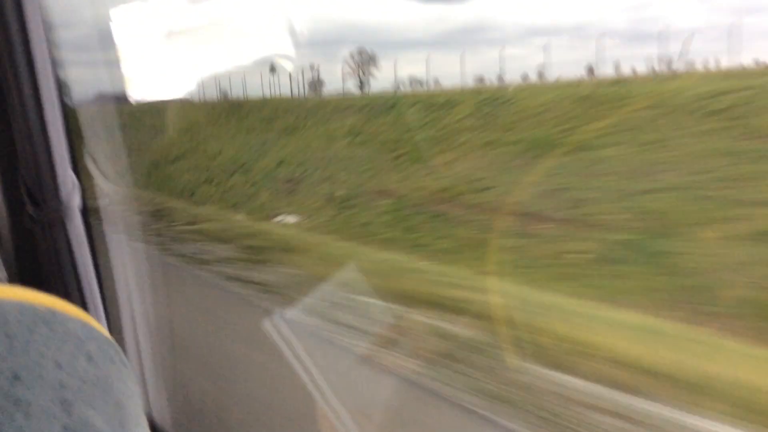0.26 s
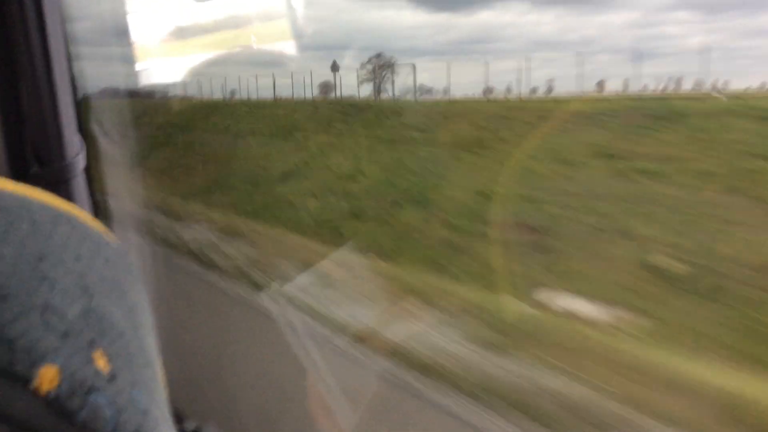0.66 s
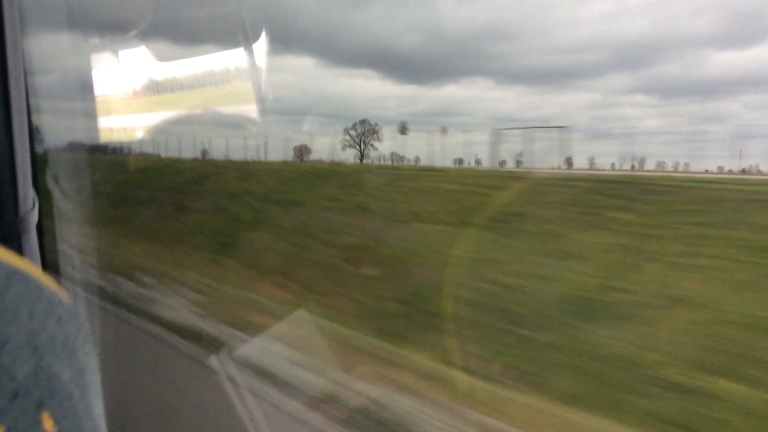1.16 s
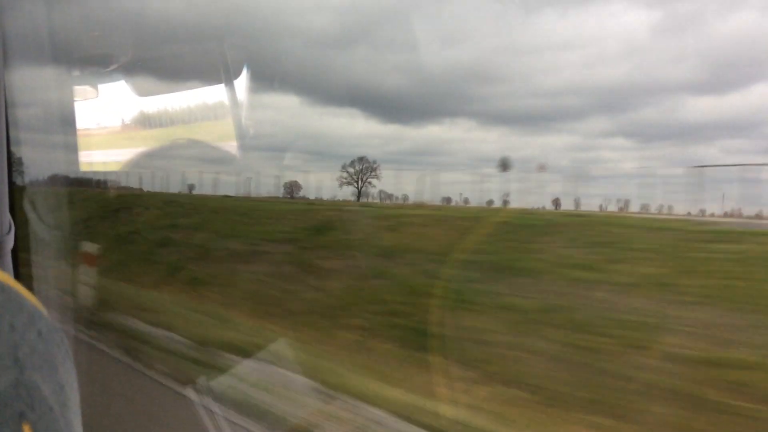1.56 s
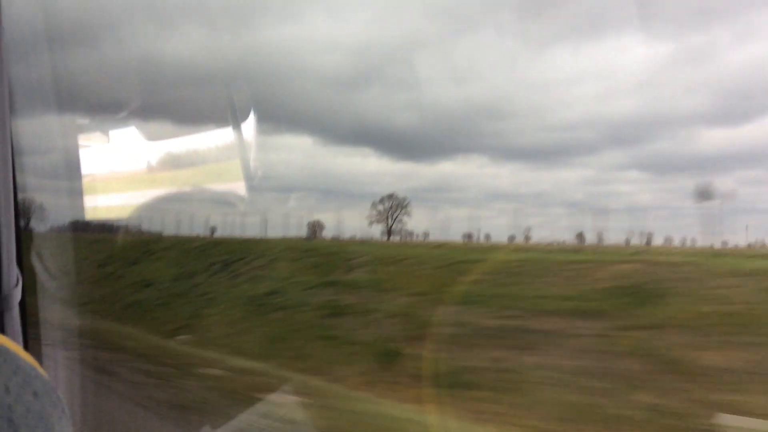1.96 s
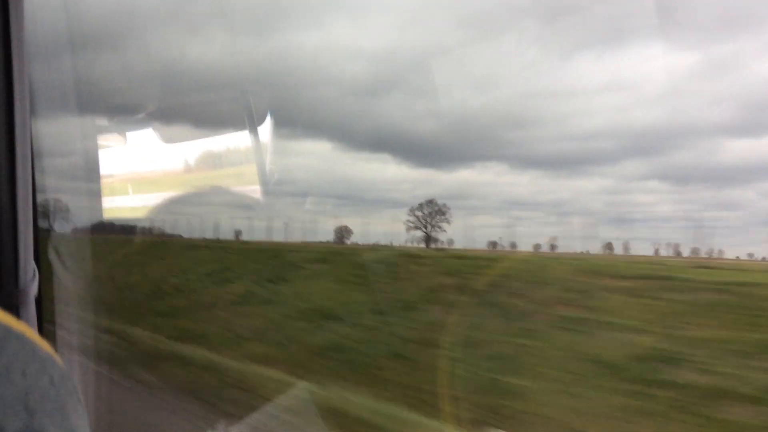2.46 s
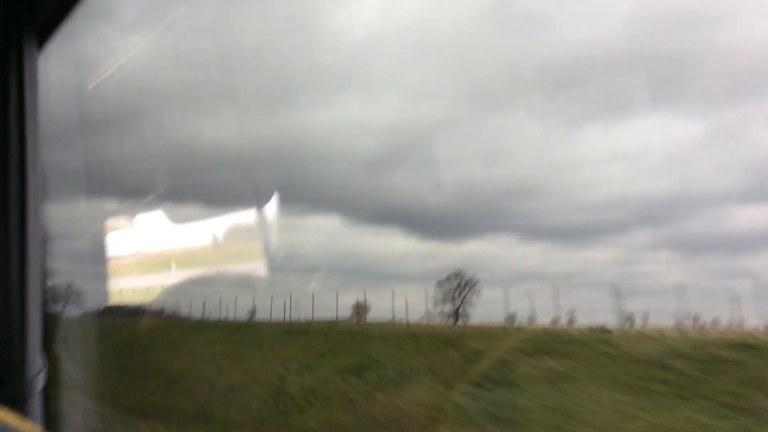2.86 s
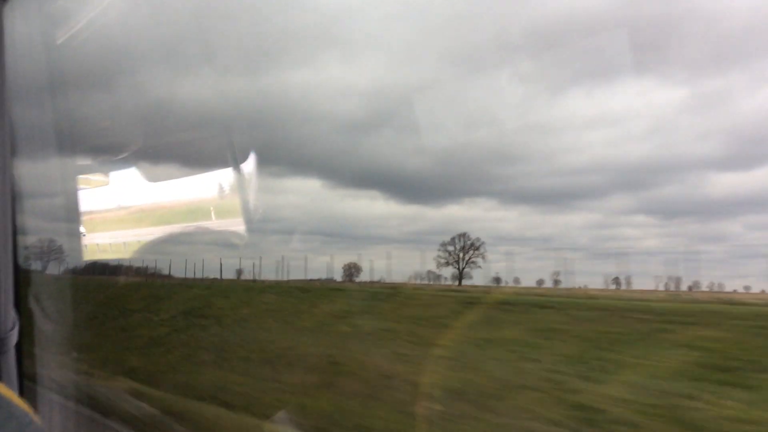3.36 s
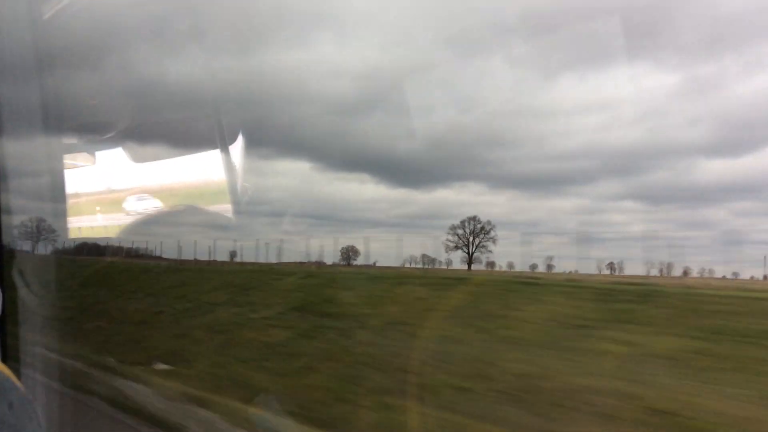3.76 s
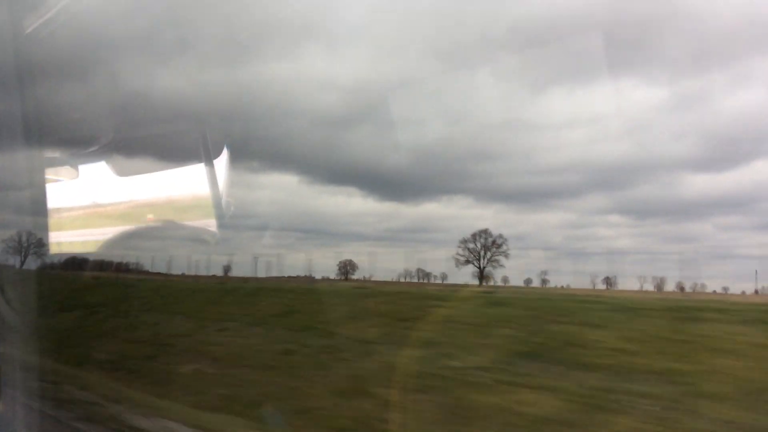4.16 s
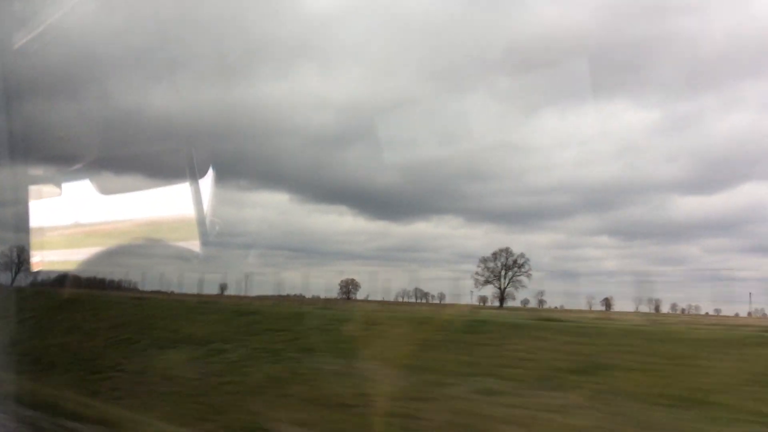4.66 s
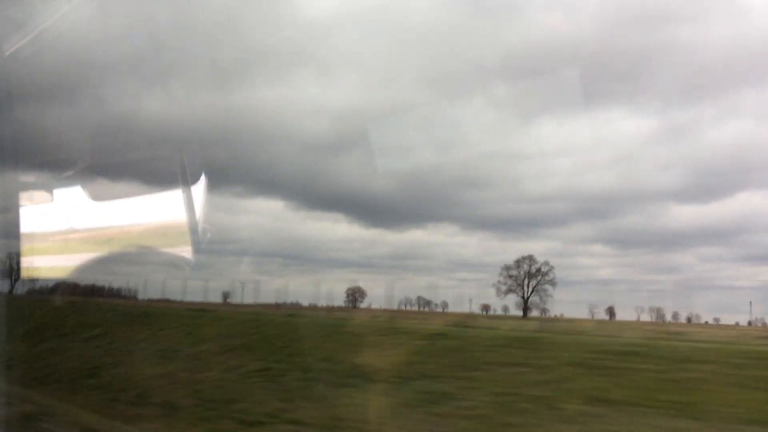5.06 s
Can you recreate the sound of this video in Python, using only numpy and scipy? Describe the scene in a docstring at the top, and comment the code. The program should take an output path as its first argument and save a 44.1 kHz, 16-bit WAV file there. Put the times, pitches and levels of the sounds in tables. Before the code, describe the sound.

Inside a moving coach, a deep, booming road rumble runs throughout, with a faint engine hum and gear whine. Near the start, a gust hits the phone microphone in a loud, distorted clatter of sharp knocks. A shorter burst follows about a second later, and a weaker one comes in the second half. Very faint ticks of plastic trim and a soft sleeve rustle lie beneath the rumble.

```python
"""A deep road rumble fills a coach on a country road, heard from a phone held at a window seat.
The tyres shake the body, which booms. Three bursts of gusts hit the microphone port (its opening):
their eddies, small swirls of air, land as sharp knocks and overload it. The engine hums and the
gears whine. Plastic trim and a sleeve stir faintly, over the phone's own hiss and thin whistle."""
import sys
import numpy as np
from scipy import signal
from scipy.fft import rfft, irfft
from scipy.io import wavfile
from scipy.ndimage import uniform_filter1d

SR = 44100
rng = np.random.default_rng(int(sys.argv[2]) if len(sys.argv) > 2 else 0)


def write(x):
    x = np.atleast_2d(x).T
    wavfile.write(sys.argv[1], SR, np.round(np.clip(x, -1, 1) * 32767).astype(np.int16))

N = 234523
TIME = np.arange(N) / SR

# tone colour of the road noise in the cabin: (frequency [Hz], relative level [dB])
ROAD_COLOUR = [(6, -7), (14, 2), (32, -3.5), (65, -14), (100, -17), (135, -25.5), (220, -29), (340, -41),
               (460, -44.5), (800, -48.5), (1200, -60.5), (2200, -76.5)]
# pitches at which the body and cabin boom: (frequency [Hz], width [Hz], level [dB])
BOOMS = [(54.6, 5.3, -34.5), (87.38, 11, -30.5), (179.7, 6.5, -46.5), (294.8, 19.3, -50.5)]
# smooth patches of road: (middle [s], length [s], change in the deep rumble [dB])
SMOOTH_PATCHES = [(2.686, 0.15, -7.5), (3.674, 0.054, -5.5), (4.197, 0.06, -1.5)]
# gusts at the microphone port: (start [s], length [s], strength [dB])
GUSTS = [(0.406, 0.031, -4), (0.454, .031, -5), (.509, .026, -2), (0.547, .051, 3), (.614, .008, -5),
         (0.632, 0.033, -20.5), (0.684, .003, -1), (1.459, 0.05, -32.5), (1.528, .003, -7.5),
         (1.543, .008, -4), (1.568, 0.032, -18), (3.757, 0.01, -26), (3.783, .012, -25), (3.801, .003, -10),
         (3.818, .024, -36)]
# single large eddies that knock on the port: (time [s], strength [dB], width [ms])
KNOCKS = [(0.411, 14.5, .2), (0.4457, 7, 0.19), (0.635, 2.5, .12), (0.6784, -6.5, 0.18), (.683, 12, .06),
          (0.6998, -8.5, .37), (0.7302, -7, .76), (0.7417, -5.5, .34), (1.4732, -14, 0.35),
          (1.5164, -2.5, 0.51), (1.5183, -4.5, 0.53), (1.5219, -7.5, .22), (1.5279, 5.5, 0.15),
          (1.553, 4, 0.035), (1.5729, 8.5, 0.13), (3.7787, -8.5, 0.66), (3.8011, 2, 0.19),
          (3.8031, -2.5, 0.77), (3.821, -7.5, .64), (3.8408, -20, 0.51)]
# swarms of eddies, large to small, at a gust strength of 1:
# (rate [1/s], typical width [ms], typical strength [dB], growth with gust strength [exponent])
EDDY_SWARMS = [(328.4, 0.45, -7, 0.63), (902.3, 0.24, -6, 0.73), (2599, 0.02, -10.5, 1.6)]
# how the port colours the sound of the air: (frequency [Hz], gain [dB])
PORT_COLOUR = [(120, 0.5), (500, -1), (900, 0.5), (1700, 1.5), (3000, 1.5), (6000, -3.5), (15000, -7.5)]
# engine hum and gear whine: (pitch [Hz], level [dB], wander [share of pitch], flutter [dB])
DRIVELINE_TONES = [(51.34, -30.5, .02, 4), (178.9, -48.5, 0.0073, 3), (575.8, -50.5, 0.0018, 2.1)]
# ticks of the plastic trim: (time [s], strength [dB])
TRIM_TICKS = [(0.075, -54.5), (1.275, -59), (2.03, -64.5), (2.299, -61), (2.855, -68), (3.14, -67),
              (3.573, -62.5), (4.264, -60.5)]
# strokes of a sleeve over the seat: (middle [s], length [s], strength [dB])
SLEEVE_STROKES = [(0.873, .24, -65.5), (1.474, 0.45, -67), (1.91, .08, -68.5), (2.336, 0.59, -69.5),
                  (3.35, 0.24, -75)]
# where the phone's whistle grows louder: (middle [s], length [s], change [dB])
WHISTLE_SWELLS = [(3.78, .27, 14)]


def road_rumble(road_db=-22.5, deep_db=-22.5, deep_hz=115, boom_swell_db=.97, average_s=.18):
    """Tyres shake the body and it booms; the deep part holds steady but eases on smooth road."""
    road = noise(colour(ROAD_COLOUR))
    cabin = undb(road_db) * butter(road, 2300, "lowpass", order=2)  # the closed cabin keeps treble out
    for centre, width, db in BOOMS:
        boom = noise(lambda hz: 1 / (1 + ((hz - centre) / width) ** 2))
        cabin += boom * undb(db + boom_swell_db * drift(1.4))
    # take the deep part and divide it by its own running level to make it steady
    deep = shape(cabin, lambda hz: 1 / (1 + (hz / deep_hz) ** 8))
    steady = deep / np.sqrt(uniform_filter1d(deep ** 2, int(average_s * SR)))
    easing_db = sum(db * plateau(s, length, edge_s=.015) for s, length, db in SMOOTH_PATCHES)
    return cabin - deep + steady * undb(deep_db + easing_db)


def wind_on_microphone(flutter_hz=170, flutter_db=2.5, churn_hz=1700, fizz_hz=3000, leak_hz=75):
    """Gusts break into eddies; the air churns between them and fizzes over the edge of the port."""
    strength = sum(undb(db) * gust(s, length) for s, length, db in GUSTS)
    strength *= undb(flutter_db * drift(flutter_hz))
    pressure = eddies(strength)
    churn = strength * noise(lambda hz: 1 / (1 + (hz / churn_hz) ** 2)) * undb(-22)
    fizz = pressure * noise(lambda hz: 1 / np.hypot(1, hz / fizz_hz)) * undb(-29)
    at_port = shape(pressure + churn + fizz, colour(PORT_COLOUR))
    # the microphone's vent lets steady pressure leak away, so every spike swings back
    return butter(at_port, leak_hz, "highpass") + air_thud(strength)


def gust(start, length, front_db=4.5, settle_s=.0045, rise_s=.00064, fall_s=.001, fringe_s=.009):
    """A gust hits hardest at its front, holds and dies away, inside a fringe of weaker swirling air."""
    before = np.maximum(start - TIME, 0)
    after = np.maximum(TIME - start - length, 0)
    front = undb(front_db * np.exp(-np.abs(TIME - start) / settle_s))
    core = front * np.exp(-before / rise_s - after / fall_s)
    fringe = undb(-17.5) * np.exp(-((before + after) / fringe_s) ** 2)
    return np.maximum(core, fringe)


def eddies(strength, scatter_db=4, slowing=.29):
    """Large eddies knock among swarms of others; weak gusts carry slower, duller swarms."""
    pressure = np.zeros(N)
    for s, db, width_ms in KNOCKS:
        add_eddy(pressure, s, undb(db), width_ms)
    for rate, width_ms, db, growth in EDDY_SWARMS:
        # eddies arrive unevenly, each with its own size
        jitter, scatter = rng.standard_normal((20000, 2)).T
        times = (np.arange(len(jitter)) + .4 * jitter) / rate
        push = np.interp(times, TIME, strength)
        for k in np.flatnonzero(push > .01):
            height = undb(db + scatter_db * scatter[k]) * push[k] ** growth
            add_eddy(pressure, times[k], height, width_ms / push[k] ** slowing)
    return pressure


def add_eddy(pressure, s, height, width_ms, fall_ratio=.67, rounding=.2):
    """One eddy is a spike of pressure: it builds to a rounded point and drops faster than it rose."""
    offsets = np.arange(-300, 300)
    from_peak = offsets / SR * 1000 / width_ms
    lopsided = np.where(from_peak < 0, from_peak, from_peak / fall_ratio)
    pressure[int(s * SR) + offsets] += height * np.exp(rounding - np.hypot(lopsided, rounding))


def air_thud(strength, thud_hz=55, linger_s=.07):
    """The whole mass of moving air sways slowly against the port: a deep thud under each gust."""
    lingering = np.maximum(uniform_filter1d(strength, int(linger_s * SR)), 0)
    sway = noise(lambda hz: 1 / (1 + (hz / thud_hz) ** 4))
    return undb(-22) * lingering ** .2 * sway


def driveline():
    """Engine and gears turn at cruising speed: tones that waver in pitch and level."""
    tones = 0
    for hz, db, wander, flutter_db in DRIVELINE_TONES:
        pitch = hz * (1 + wander * drift(1.6))
        phase = 2 * np.pi * np.cumsum(pitch) / SR
        tones += level(np.sin(phase) * undb(flutter_db * drift(11)), db)
    return tones


def trim_rattles(band_hz=(900, 2600), grain_db=3, decay_s=.01):
    """Plastic panels shift and give short, dull rattles with a crisp edge."""
    ticks = sum(undb(db) * (TIME >= s) * np.exp(-np.abs(TIME - s) / decay_s) for s, db in TRIM_TICKS)
    rattle = rng.standard_normal(N) * undb(grain_db * drift(300))
    dull = level(butter(rattle, band_hz, "bandpass", order=2), -1)
    crisp = level(rattle, -9)
    return (dull + crisp) * ticks


def sleeve_rustle(centre_hz=5300, width_hz=1300, grain_db=2, resting_db=-90):
    """Cloth slides over the seat in a few soft strokes: a high, grainy rustle."""
    rustle = noise(lambda hz: 1 / (1 + ((hz - centre_hz) / width_hz) ** 2) + undb(-4))
    grainy = level(rustle * undb(grain_db * drift(60)), 0)
    strokes = sum(undb(db) * plateau(s, length, edge_s=.1) for s, length, db in SLEEVE_STROKES)
    return grainy * (undb(resting_db) + strokes)


def phone_electronics(hiss_db=-82, whistle_hz=14998, resting_db=-84.5):
    """The phone's circuits add a faint hiss and a thin whistle that swells once."""
    swell_db = sum(db * plateau(s, length, edge_s=.01) for s, length, db in WHISTLE_SWELLS)
    whistle = level(np.sin(2 * np.pi * whistle_hz * TIME), resting_db) * undb(swell_db)
    return level(rng.standard_normal(N), hiss_db) + whistle


def undb(db):
    """Turn decibels into a number to multiply by."""
    return 10 ** (np.asarray(db) / 20)


def level(x, db):
    """Scale a sound to an average (rms) level."""
    return x * undb(db) / np.sqrt(np.mean(x ** 2))


def noise(gain):
    """Noise of average (rms) size 1, coloured by gain(Hz)."""
    return level(shape(rng.standard_normal(N), gain), 0)


def drift(rate_hz):
    """A random wobble of typical size 1, mostly slower than rate_hz."""
    return noise(lambda hz: 1 / (1 + (hz / rate_hz) ** 2))


def butter(x, hz, kind, order=1):
    """Keep the lows, the highs or a band in between."""
    return signal.sosfilt(signal.butter(order, hz, kind, fs=SR, output="sos"), x)


def colour(points):
    """Join (frequency [Hz], gain [dB]) points into a curve gain(Hz)."""
    frequencies, dbs = np.transpose(points)
    return lambda hz: undb(np.interp(np.log(hz), np.log(frequencies), dbs))


def shape(x, gain):
    """Turn each frequency up or down by gain(Hz)."""
    hz = np.maximum(np.arange(N // 2 + 1) * SR / N, 1e-3)
    return irfft(rfft(x) * gain(hz), N)


def plateau(middle, length, edge_s):
    """Rise smoothly towards 1, hold and fall."""
    return .5 + .5 * np.tanh((length / 2 - np.abs(TIME - middle)) / edge_s)


def scene():
    """The cabin, the air on the microphone and the phone's own noise, in one channel."""
    cabin = road_rumble() + driveline() + trim_rattles() + sleeve_rustle()
    return (cabin + wind_on_microphone() + phone_electronics())[None]


def record(dry, ceiling=.73, top_hz=15600):
    """The phone flattens peaks that overload it and cuts the highest treble."""
    flattened = dry / (1 + (dry / ceiling) ** 8) ** (1 / 8)
    treble_cut = signal.ellip(8, .2, 70, top_hz, fs=SR, output="sos")
    return signal.sosfilt(treble_cut, flattened)


dry = scene()
out = record(dry)
write(out)
```